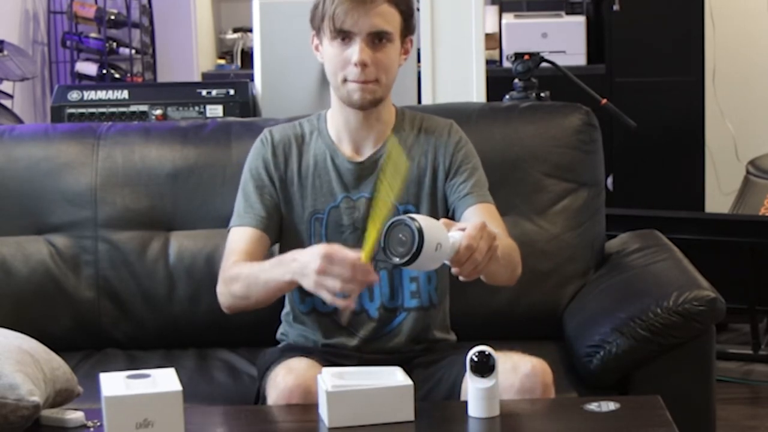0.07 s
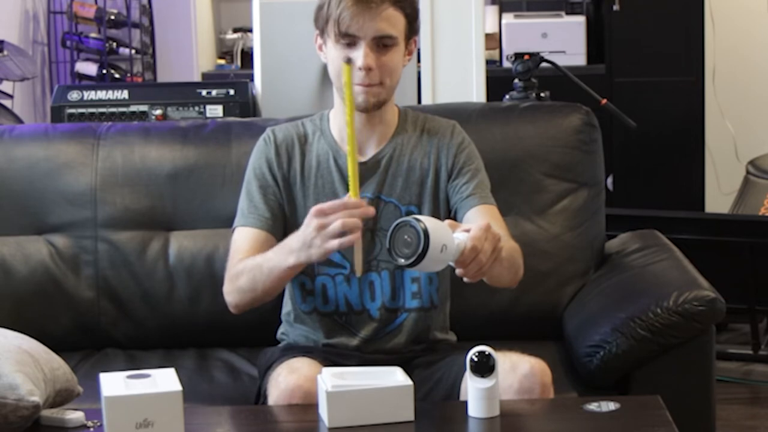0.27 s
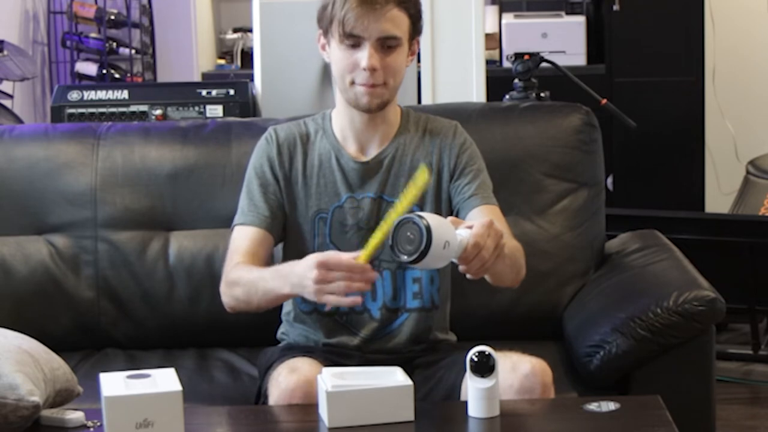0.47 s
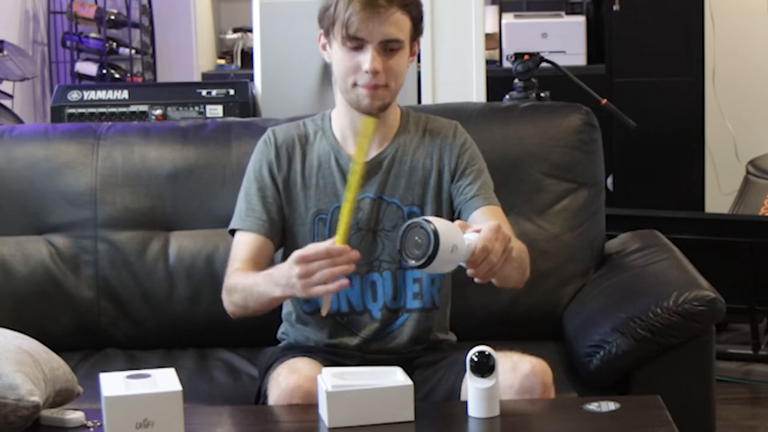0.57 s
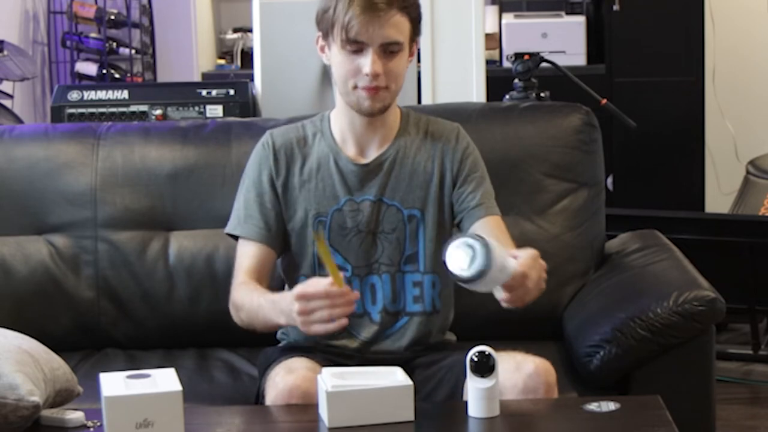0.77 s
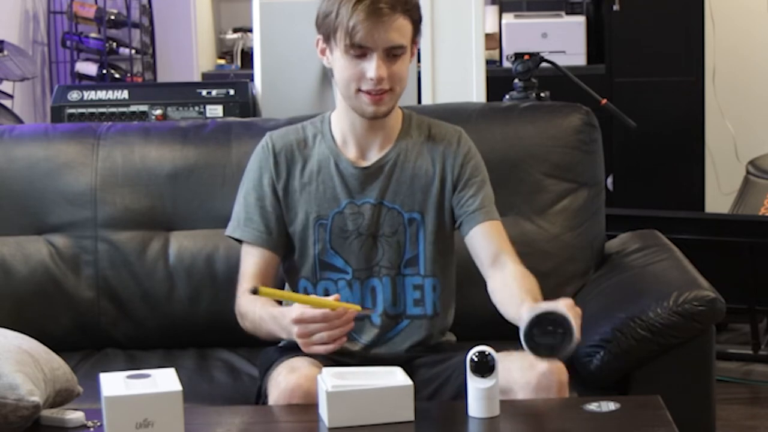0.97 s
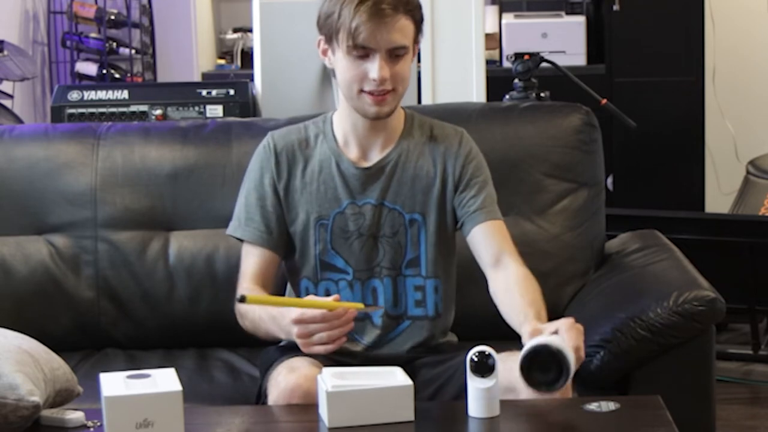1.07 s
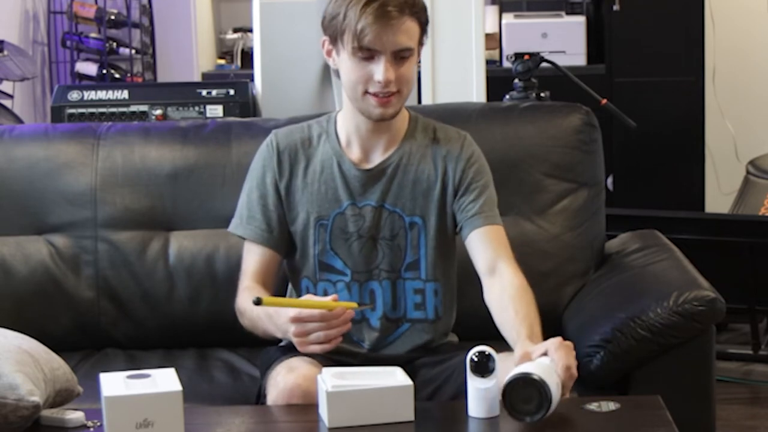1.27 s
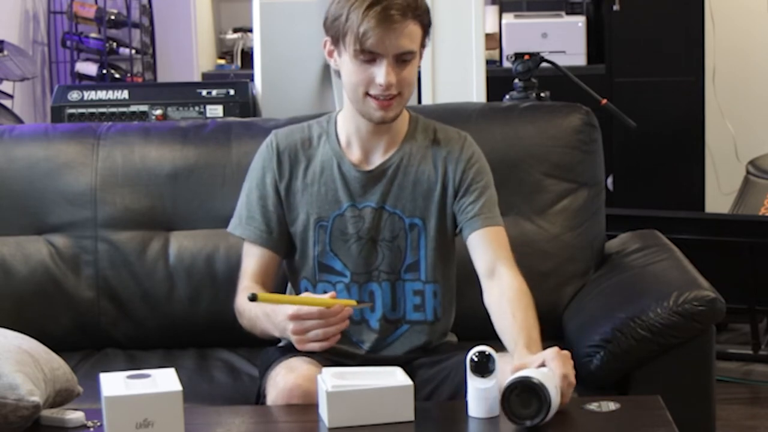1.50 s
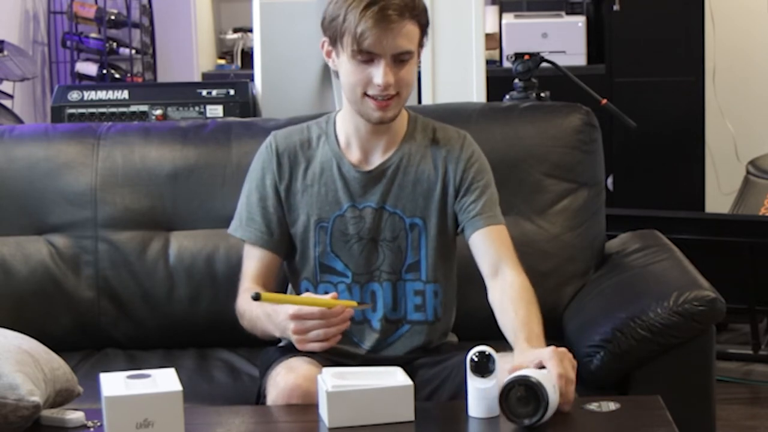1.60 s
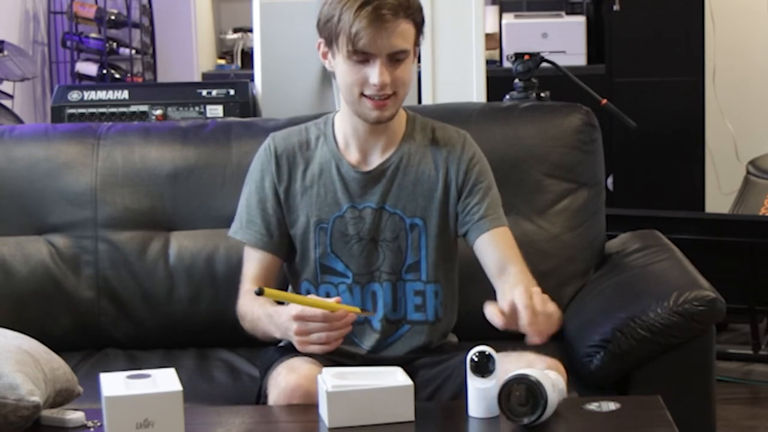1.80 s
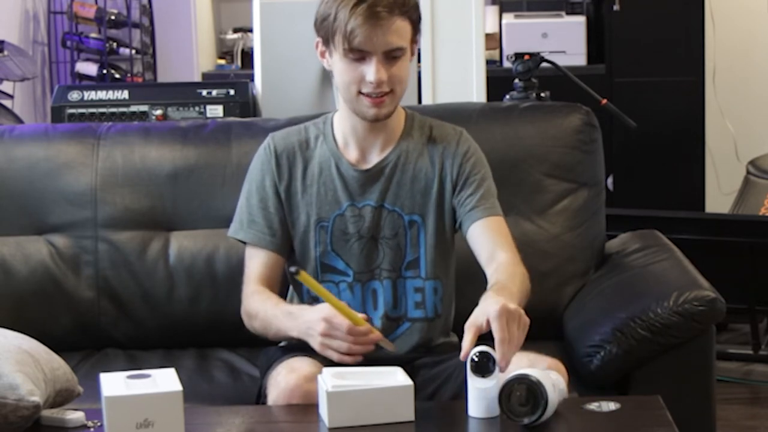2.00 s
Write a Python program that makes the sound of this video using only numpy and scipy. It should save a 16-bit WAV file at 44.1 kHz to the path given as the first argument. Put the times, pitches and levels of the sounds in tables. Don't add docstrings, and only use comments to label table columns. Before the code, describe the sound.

Wooden stick taps a hand-held metal housing twice, sharply, then it thumps down on a table

```python
import sys
import numpy as np
from scipy import signal
from scipy.io import wavfile

SR = 44100
rng = np.random.default_rng(int(sys.argv[2]) if len(sys.argv) > 2 else 0)


def nominal_scale(level):
    x = np.asarray(level, float) / 20
    return 10 ** x


def put_to_file(sound):
    columns = np.atleast_2d(sound).T
    safe = np.clip(columns, -1, 1)
    whole_steps = np.round(safe * 32767)
    wavfile.write(sys.argv[1], SR, whole_steps.astype(np.int16))


N = 90404
LEAD = 13230


def at_hz(points, hz):
    table_hz, value = np.array(points)[:, :2].T
    return np.interp(np.log(hz), np.log(table_hz), value)


def clicks(start_s, level_db):
    out = np.full(N + LEAD, 1e-18)
    np.add.at(out, (np.asarray(start_s) * SR).astype(int) + LEAD, nominal_scale(level_db))
    return out


def ring(x, hz, t60_s):
    r = nominal_scale(-60 / (t60_s * SR))
    w = 2 * np.pi * hz / SR
    return signal.lfilter([0, np.sin(w)], [1, -2 * r * np.cos(w), r * r], x)


def soften(x, hz):
    r = np.exp(-2 * np.pi * hz / SR)
    return signal.lfilter([(1 - r) ** 2], [1, -2 * r, r * r], x)


def highpass(x, hz):
    return signal.sosfilt(signal.butter(2, hz, "high", fs=SR, output="sos"), x)


def touches(start_s, level_db, softness_hz):
    return sum(soften(clicks([s], [db]), hz) for s, db, hz in zip(start_s, level_db, softness_hz))


def bands(count, gain):
    settle = 4000
    edges_hz = 20 * 2 ** np.arange(0, 10, .5)
    white = rng.standard_normal((2, count + settle))
    total = 0
    for k, (low, high) in enumerate(zip(edges_hz, edges_hz[1:])):
        sos = signal.butter(2, [low, high], "band", fs=SR, output="sos")
        total = total + gain(np.sqrt(low * high)) * signal.sosfilt(sos, white[k % 2])[settle:]
    return total


def sweep(turns, rise_s, fall_s):
    t = np.arange(1, 900) / SR
    onset = (t / rise_s) ** 4
    shape = onset / (1 + onset) * np.exp(-t / fall_s)
    return shape * np.sin(2 * np.pi * turns * np.log(t / rise_s))


# pitch_hz, level_db [dB per Hz]
AIR_SPECTRUM = [(28, -4.5), (63, 0.5), (200, -6.5), (500, -15), (1000, -20), (2000, -25), (5000, -31),
                (13000, -40.5)]


def room_tone():
    air_db, hum_db, whine_db = -59.5, -68, -93
    hum_hz, whine_hz, width_hz = 112, 7800, 6
    air = bands(N, lambda hz: nominal_scale(at_hz(AIR_SPECTRUM, hz)))
    air = signal.sosfilt(signal.butter(8, 13700, fs=SR, output="sos"), air)
    hum, whine = (ring(rng.standard_normal(N + SR), hz, 2.2 / width_hz)[SR:] for hz in (hum_hz, whine_hz))
    return nominal_scale(air_db) * air / air.std() + nominal_scale(hum_db) * hum / hum.std() + nominal_scale(whine_db) * whine / whine.std()


# start_s, crack_db, softness_hz
TAPS = [
    (-.17, -7, 8000),
    (0.1733, -6, 10000),
    (0.52, -2.5, 7500),
]
# pitch_hz, t60_s, then level_db at each of the three tapped spots
HOUSING_MODES = [(448.6, 0.18, -59, -48, -42.5), (900, .009, -34, -31.5, -29.5),
                 (1188, 0.018, -25.5, -26.5, -26.5), (2158, 0.07, -24, -20, -19),
                 (2356.5, .07, -35, -33.5, -23.5), (3244, 0.03, -23, -22.5, -22.5),
                 (3674, 0.024, -32.5, -45.5, -27), (4481, 0.035, -18, -18, -18.5),
                 (5210, 0.017, -25.5, -23, -18), (5885, 0.021, -23.5, -18, -14),
                 (6846, 0.012, -33.5, -24.5, -17), (9070, 0.018, -23, -25.5, -31),
                 (10830, 0.017, -34, -29.5, -25.5), (12020, 0.012, -35.5, -24.5, -25.5)]


def stick():
    start_s, crack_db, softness_hz = np.transpose(TAPS)
    touch = touches(start_s, crack_db, softness_hz)
    crack = signal.fftconvolve(touch, sweep(turns=5.066, rise_s=0.0003091, fall_s=0.00099))[:N + LEAD]
    modes = 0
    for k, (hz, t60_s, *spots_db) in enumerate(HOUSING_MODES):
        modes = modes + (-1) ** k * ring(clicks(start_s + 0.00021, spots_db), hz, t60_s)
    return highpass(crack, 750) + highpass(modes, 260)


def snap():
    start_s, crack_db, _ = np.transpose(TAPS)
    snap_db, lag_s = -9, .0002
    shape = [1, -.8, .9, 0, -.7, .6, 0, 0, .5, -.4, 0, .3]
    burst = np.convolve(clicks(start_s + lag_s, crack_db + snap_db), shape)[:N + LEAD]
    return highpass(burst, 7000)


# pitch_hz, t60_s
ROOM_T60 = [(60, 0.54), (250, .42), (500, 0.51), (1200, 0.55), (2200, 0.67), (4500, 0.64), (8000, 0.48),
            (14000, .36)]
# delay_s, level_db [over the dense echoes]
ECHOES = [(.0075, 15.5), (.0118, 18), (0.0146, 12), (0.025, 12)]


def room(x):
    gap_s, build_s, scatter, echo_hz = 0.0028, 0.013, .1, 7000
    t = np.arange(SR) / SR
    dense = bands(SR, lambda hz: nominal_scale(-60 * t / at_hz(ROOM_T60, hz)))
    build = 1 - np.exp(-np.maximum(t - gap_s, 0) / build_s)
    early = soften(clicks(*np.transpose(ECHOES))[LEAD:LEAD + SR], echo_hz)
    return signal.fftconvolve(x, dense * (scatter + build) + early)[:len(x)]


# start_s, level_db, pitch_hz
FINGER_TICKS = [
    (1.137, -57, 7310),
    (1.136, -64, 10100),
    (1.137, -65, 13000),
    (1.389, -65, 5910),
    (1.389, -59, 7810),
    (.852, -45, 600),
    (.852, -52, 900),
]


def finger_ticks():
    return sum(ring(clicks([s], [db]), hz, t60_s=0.0094) for s, db, hz in FINGER_TICKS)


# start_s, tick_db, thump_db, scuff_db, softness_hz
CONTACTS = [
    (1.4251, -7, -9.5, -27.5, 3570),
    (1.4681, -16, -15.5, -50, 3000),
    (1.7113, -19.5, -39, -37, 1600),
    (1.7182, -24.5, -14.5, -69, 2530),
    (1.755, -26, -26, -64, 1000),
]
# pitch_hz, level_db, t60_s
FOOT_MODES = [(511.7, -0.5, 0.083), (613.5, -8.5, 0.097), (923, -20, 0.09), (1435, -17, 0.017),
              (2730, -19, 0.0036), (4430, -20, .006)]
# pitch_hz, level_db, t60_s
TABLE_MODES = [(40, -19.5, 0.23), (74.7, -19, 0.3), (99.3, -14, 0.33), (164, -19, 0.24),
               (228.6, -15.5, 0.26), (267.5, -22, 0.068), (336, -13, .15), (439, -17, 0.3)]


def set_down():
    start_s, tick_db, thump_db, _, softness_hz = np.transpose(CONTACTS)
    thump_lag_s, thump_hz, thump_width_s, bloom_cycles = .0125, 345, .0014, 1.59
    touch = touches(start_s, tick_db, softness_hz)
    tick = signal.fftconvolve(touch, sweep(turns=2.1, rise_s=0.00087, fall_s=0.0039))[:N + LEAD]
    foot = 0
    for k, (hz, db, t60_s) in enumerate(FOOT_MODES):
        foot = foot + (-1) ** k * nominal_scale(db) * ring(soften(touch, hz), hz, t60_s)

    t = np.arange(-300, 300) / SR
    pulse = -np.cos(2 * np.pi * thump_hz * t) * np.exp(-.5 * (t / thump_width_s) ** 2)
    thump = signal.fftconvolve(clicks(start_s + thump_lag_s, thump_db), pulse - pulse.mean(), "same")

    top = 0
    for hz, db, t60_s in TABLE_MODES:
        mode = ring(clicks(start_s, thump_db), hz, t60_s)
        top = top + nominal_scale(db) * ring(mode, hz, 7 * bloom_cycles / hz) * hz / SR
    return highpass(tick + foot + thump, 90) + top


def scuff():
    start_s, _, _, scuff_db, _ = np.transpose(CONTACTS)
    lag_s, fall_s, grit_hz = 0.00087, 0.0047, 3000
    grit = signal.lfilter([1, -1], [1, -.8], soften(rng.standard_normal(N + LEAD), grit_hz))
    envelope = signal.lfilter([1], [1, -np.exp(-1 / (fall_s * SR))], clicks(start_s + lag_s, scuff_db))
    return grit * envelope


def scene():
    taps, table, grit = stick(), set_down(), scuff()
    tap_room_db, table_room_db, scuff_room_db = -23.5, -35.5, -26
    wet = room(nominal_scale(tap_room_db) * taps + nominal_scale(table_room_db) * table + nominal_scale(scuff_room_db) * grit)
    events = taps + snap() + finger_ticks() + table + grit + wet
    return (events[LEAD:] + room_tone())[None]


def band_limit(x):
    return signal.sosfilt(signal.butter(12, 17070, fs=SR, output="sos"), x)


def record(dry):
    low_pass = signal.cheby2(10, 60, 17000, fs=SR, output="sos")
    mix = signal.sosfilt(low_pass, dry)
    return band_limit(mix)


dry = scene()
out = record(dry)
put_to_file(out)
```